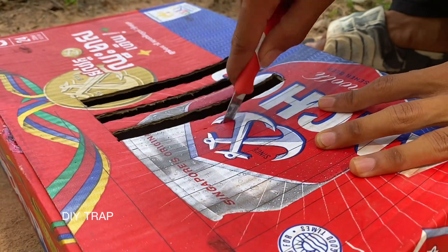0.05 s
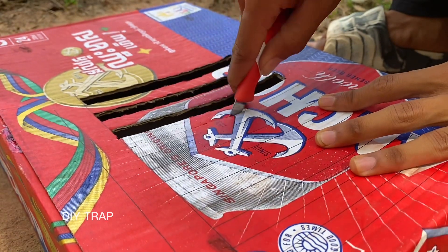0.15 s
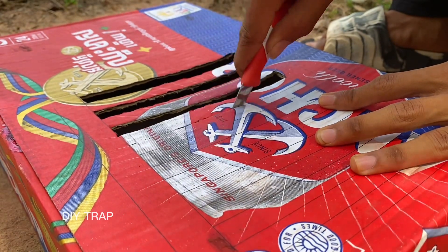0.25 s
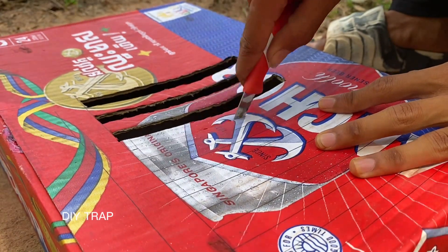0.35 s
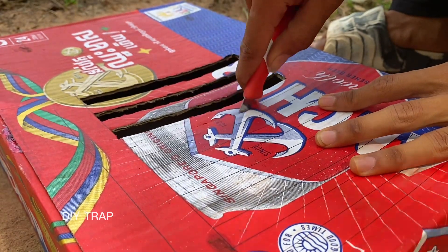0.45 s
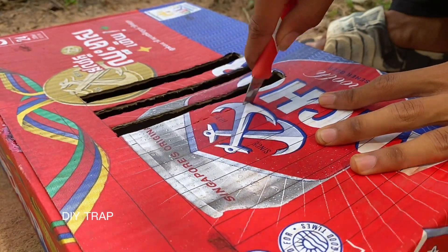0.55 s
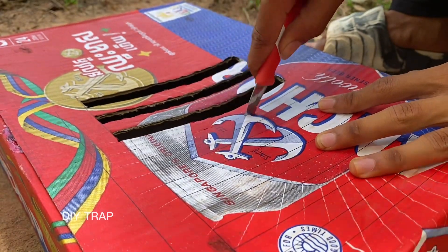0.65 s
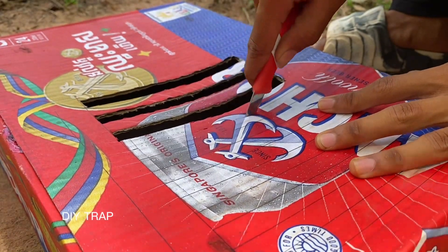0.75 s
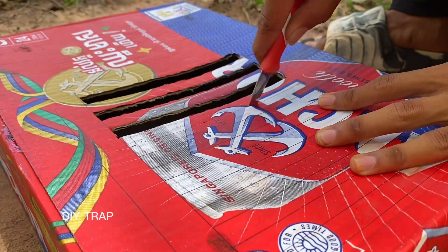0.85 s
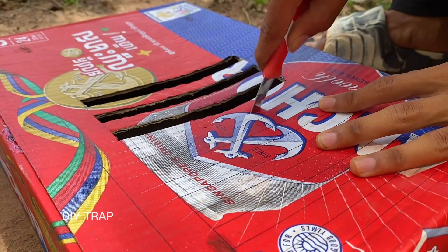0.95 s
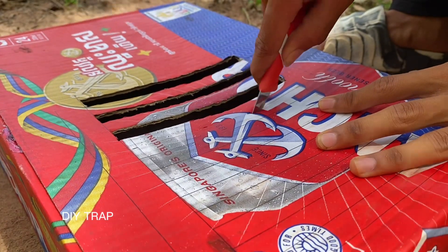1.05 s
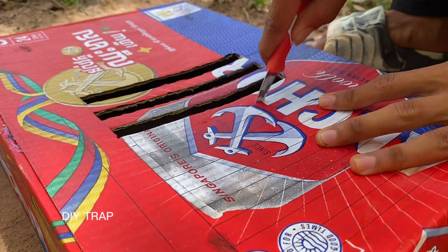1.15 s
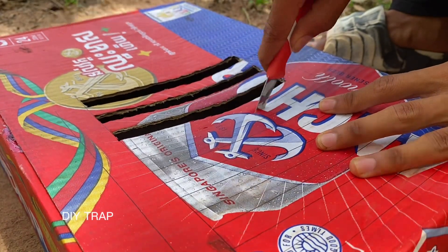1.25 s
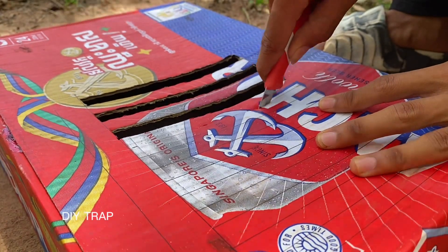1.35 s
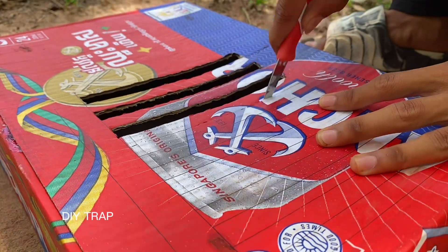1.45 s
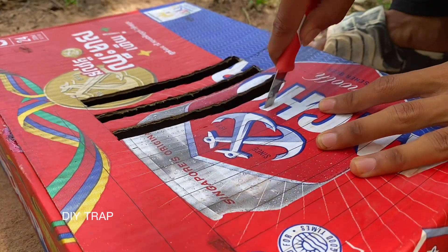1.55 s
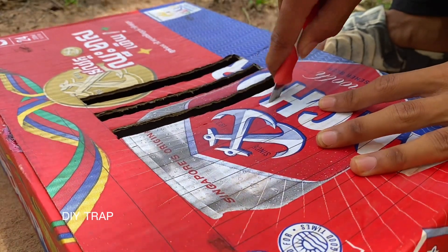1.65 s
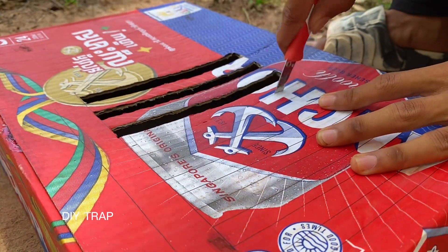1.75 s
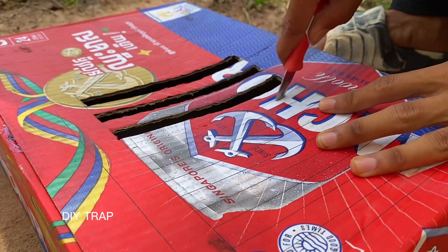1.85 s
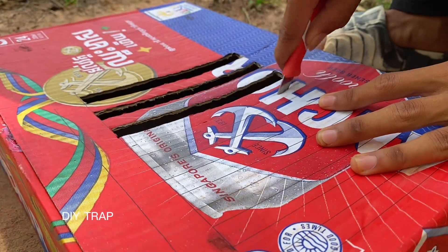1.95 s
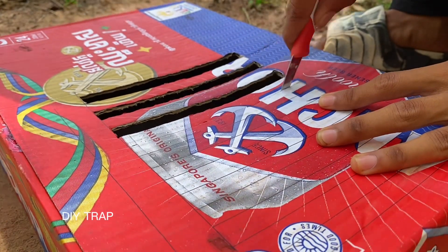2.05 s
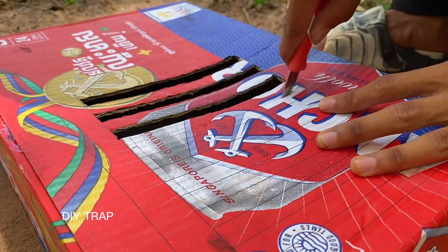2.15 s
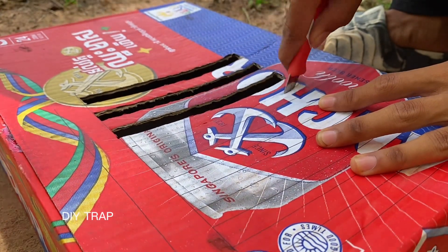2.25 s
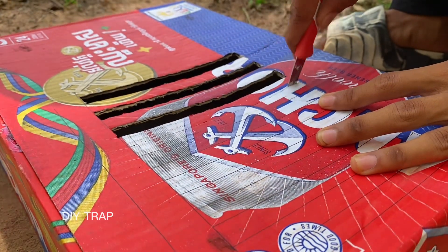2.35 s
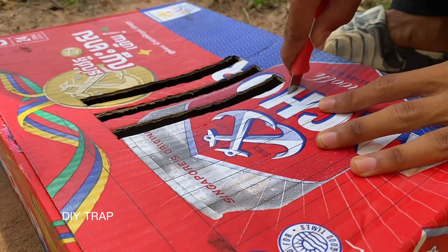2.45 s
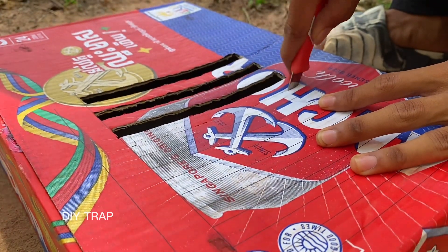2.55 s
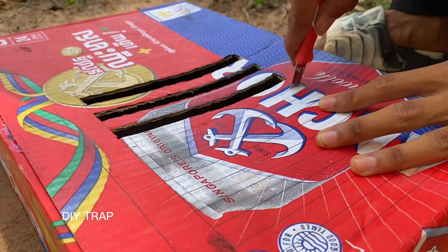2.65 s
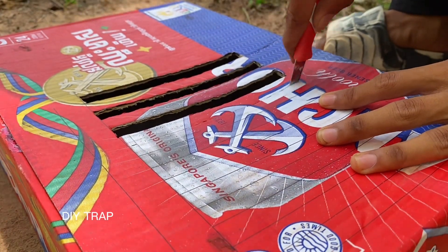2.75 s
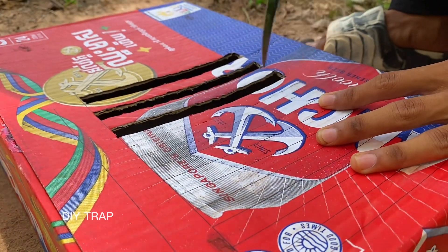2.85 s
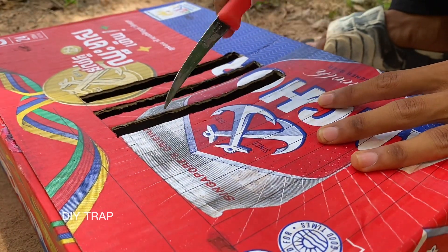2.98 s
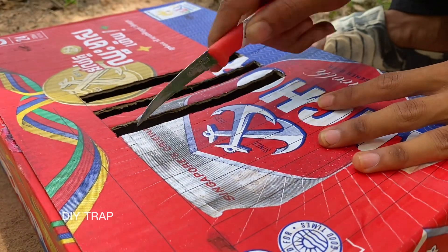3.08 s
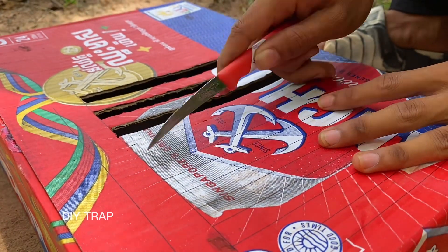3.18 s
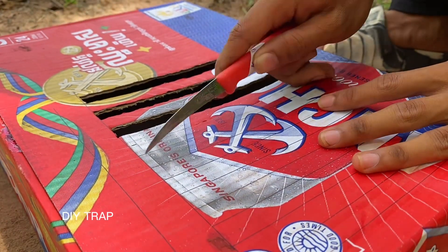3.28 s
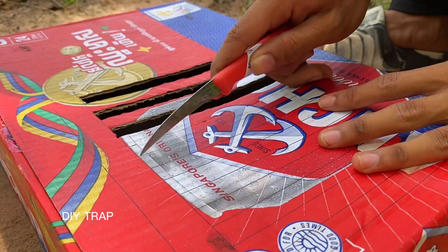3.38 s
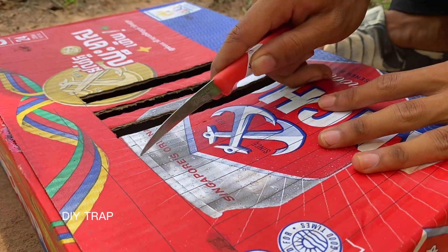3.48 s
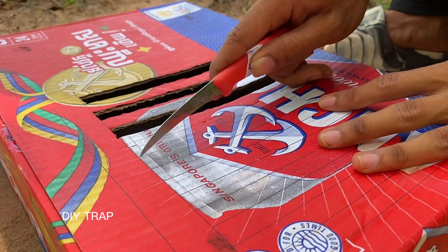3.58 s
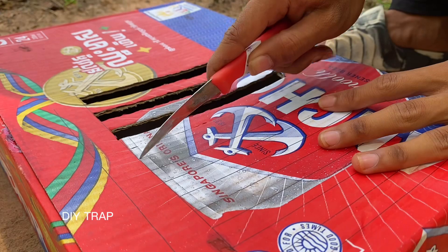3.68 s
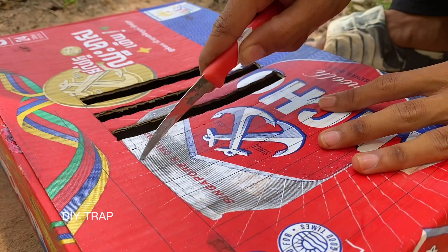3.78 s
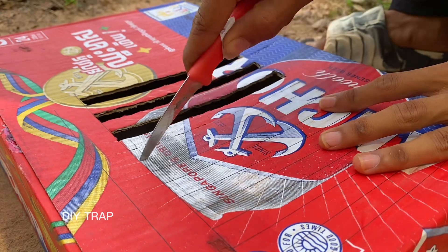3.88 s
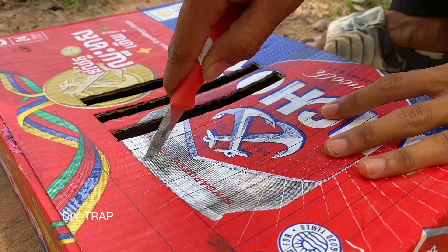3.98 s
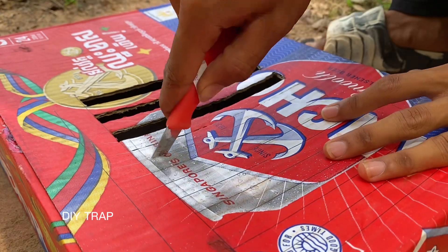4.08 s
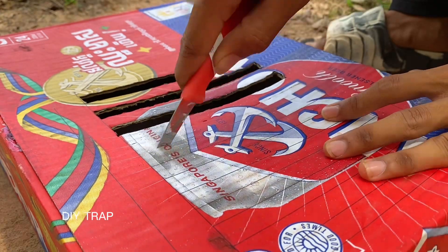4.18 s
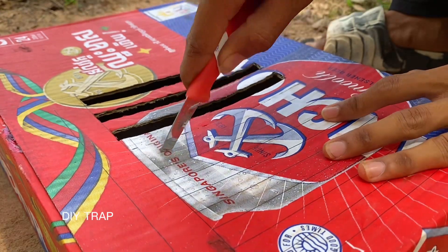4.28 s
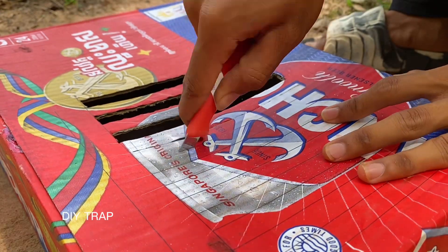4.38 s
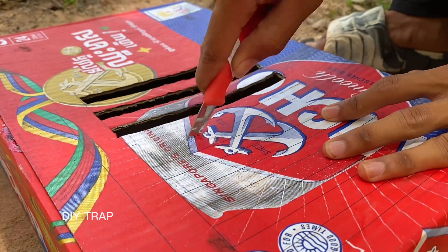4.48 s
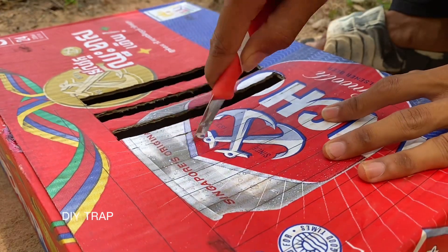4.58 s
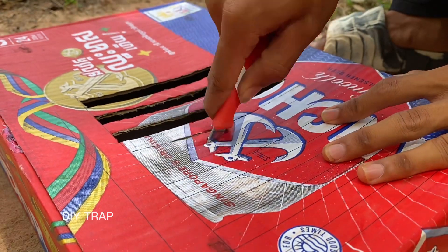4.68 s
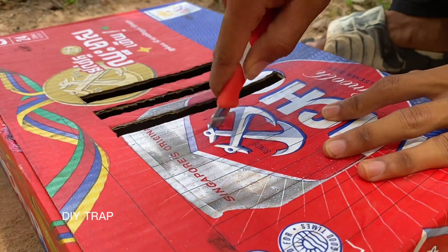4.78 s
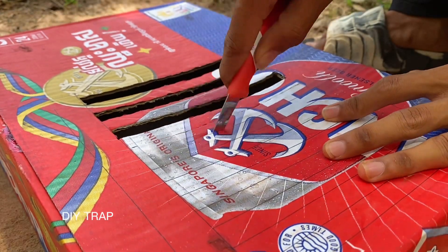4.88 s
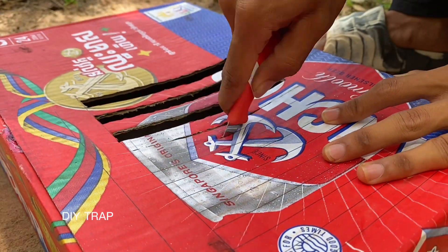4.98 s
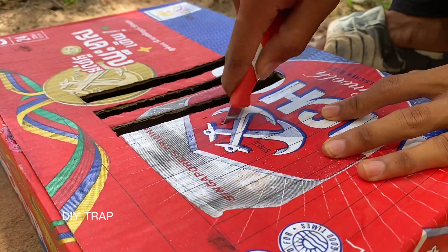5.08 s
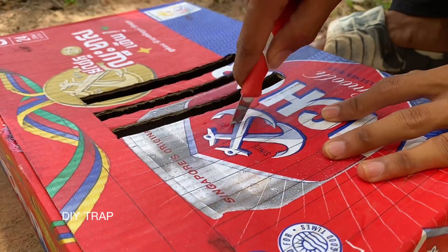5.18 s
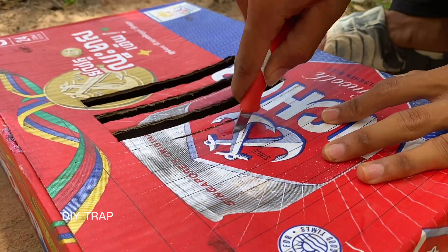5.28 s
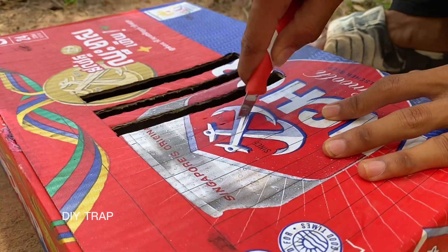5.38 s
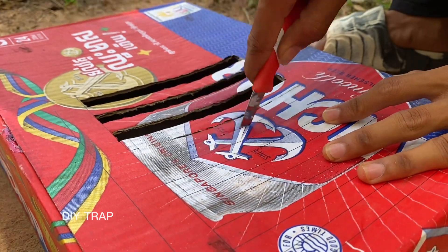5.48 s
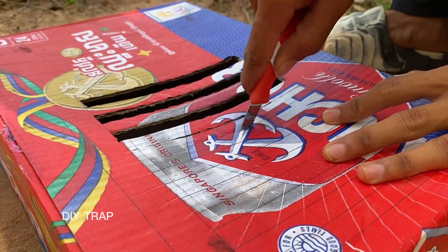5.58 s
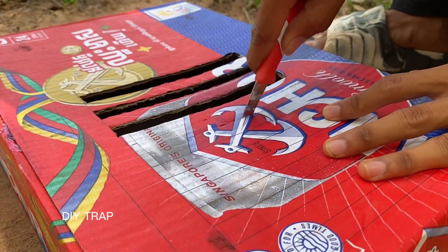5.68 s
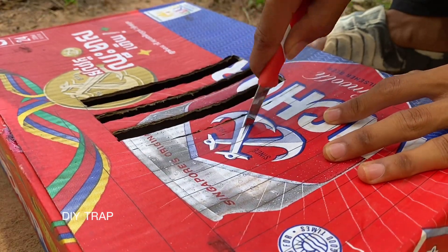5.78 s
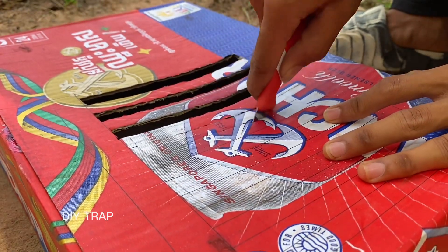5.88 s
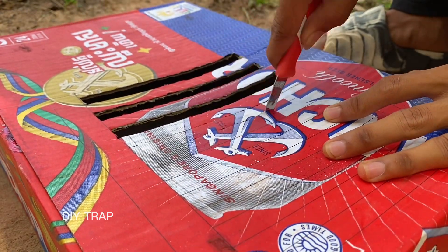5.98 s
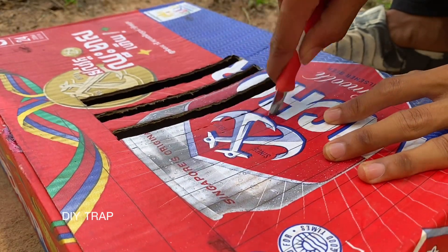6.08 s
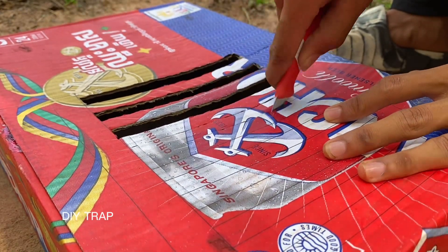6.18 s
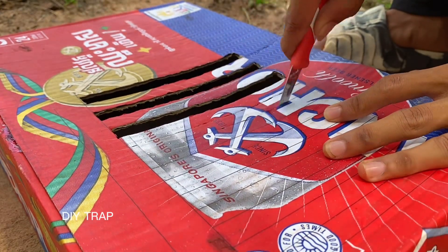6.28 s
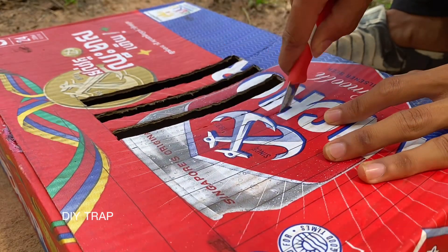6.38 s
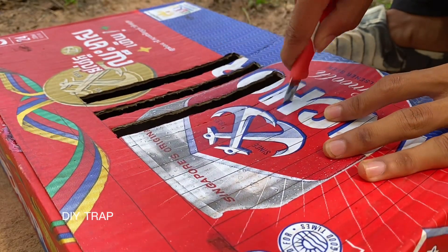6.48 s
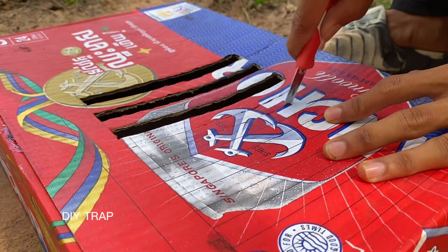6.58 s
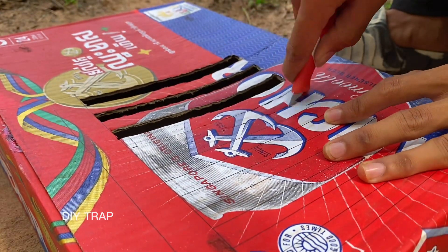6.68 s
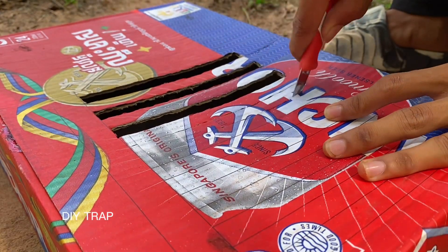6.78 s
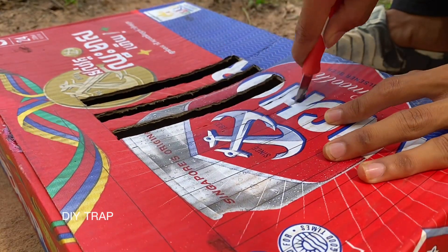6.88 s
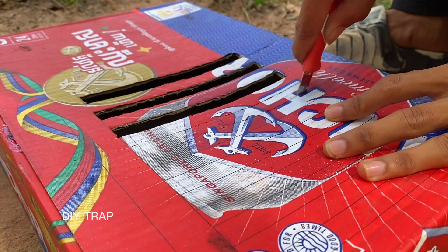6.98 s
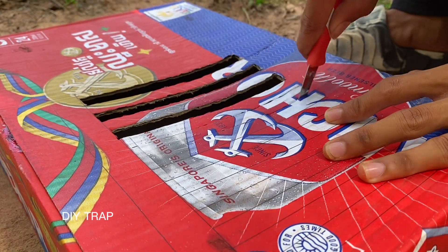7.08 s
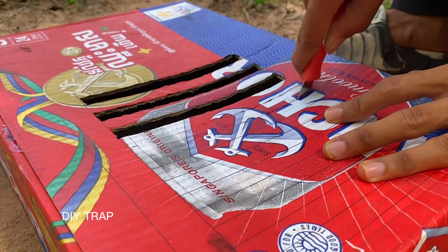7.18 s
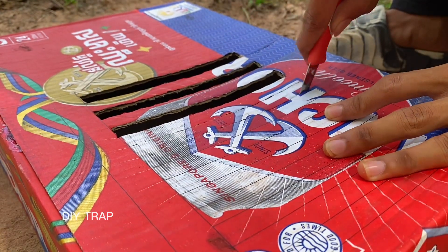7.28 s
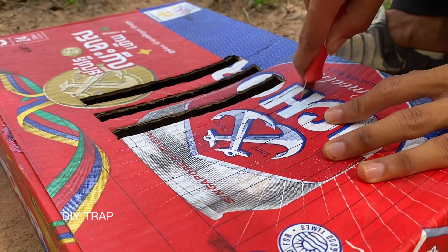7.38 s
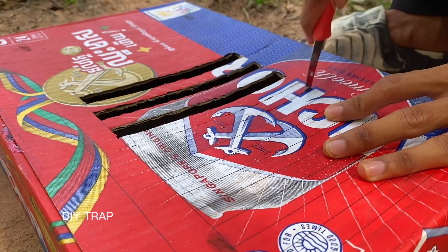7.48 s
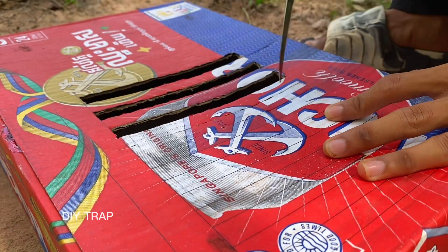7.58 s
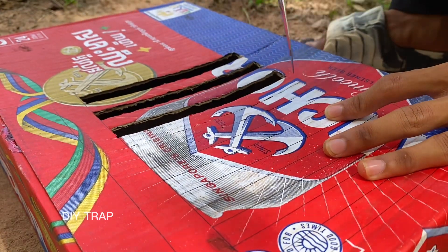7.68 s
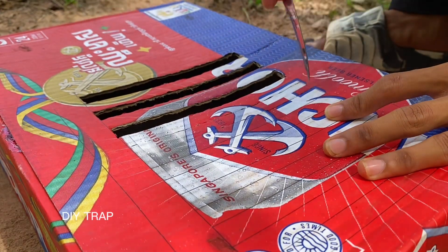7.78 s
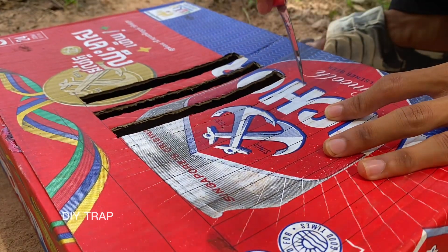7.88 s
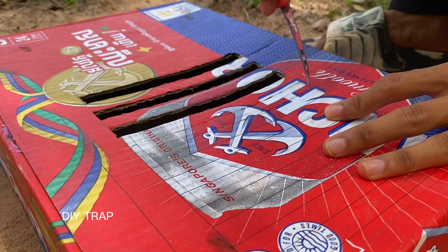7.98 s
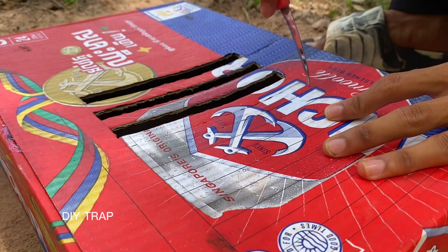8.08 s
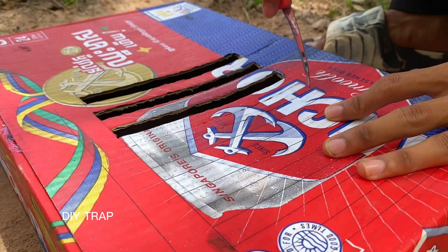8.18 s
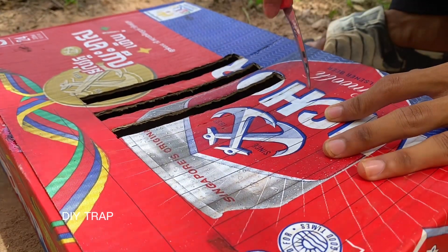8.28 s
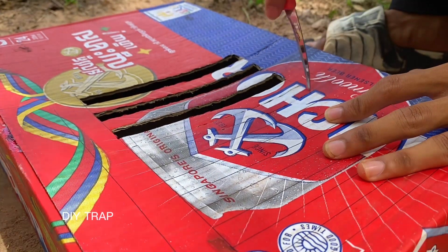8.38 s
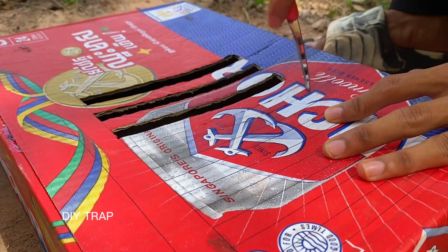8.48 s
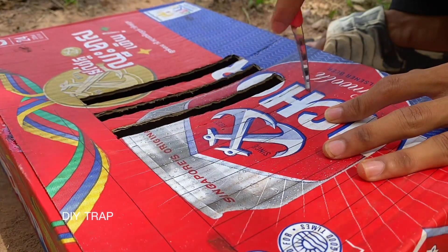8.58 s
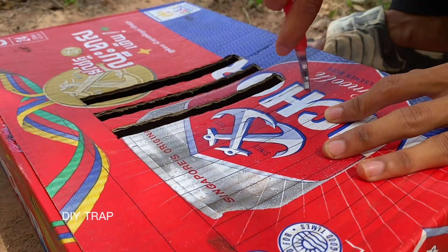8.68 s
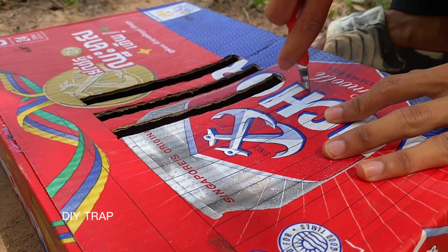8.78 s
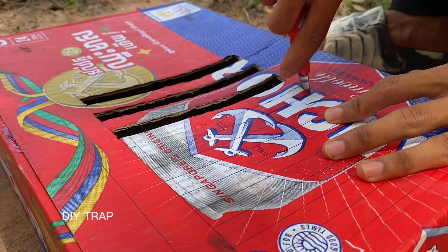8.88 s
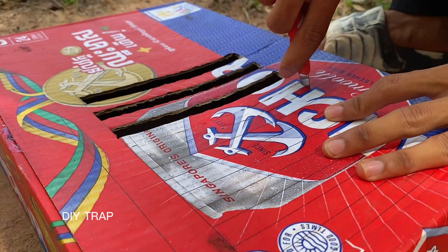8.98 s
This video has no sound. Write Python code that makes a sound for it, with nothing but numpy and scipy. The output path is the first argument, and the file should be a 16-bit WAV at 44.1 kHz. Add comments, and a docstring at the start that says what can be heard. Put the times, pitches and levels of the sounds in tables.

```python
"""A small knife saws through the lid of an empty corrugated box lying on the ground outdoors.
Each stroke tears fibres in a dense train of impulses, heard directly as a rasp and through the modes
of the lid and of the air in the hollow below; each push rocks the box on the ground. In the pauses,
fingers tap and slide on the lid. Soft air noise, a thin insect whine and a low breeze on the
microphone's two ports lie under everything."""
import sys
import numpy as np
from scipy import signal
from scipy.fft import rfft, irfft, next_fast_len
from scipy.io import wavfile

SR = 44100
rng = np.random.default_rng(int(sys.argv[2]) if len(sys.argv) > 2 else 0)


def unload_audio(sound):
    """Save the sound as a 16-bit wav file, at the path given as the first command line argument."""
    columns = np.transpose(np.atleast_2d(sound))
    # keep every value between -1 and 1, then stretch to whole-number steps
    steps = np.round(np.clip(columns, -1, 1) * 32767)
    wavfile.write(sys.argv[1], SR, steps.astype(np.int16))


N = 398663
FFT_SIZE = next_fast_len(N + 8192)
HZ = np.maximum(np.arange(FFT_SIZE // 2 + 1) * SR / FFT_SIZE, 1)

# Levels in the tables are relative: each source applies its own gain as well.
# spectrum of the air noise: frequency_hz, density_db
AIR_SPECTRUM = [(12, -54), (20, -13.5), (76, -12.5), (94, -13.5), (114, -15), (390, -23.5), (496, -26.5),
                (2000, -34), (3150, -37.5), (7220, -41), (12000, -64), (15600, -105), (22000, -120)]
# likeness of the air noise at the two ports: frequency_hz, correlation
AIR_CORRELATION = [(60, 0.58), (290, 0.34), (640, .02), (15000, 0.0091)]
# bands of the insect whine: pitch_hz, width_hz
INSECT_BANDS = [(7190, 60), (7320, 54)]
# wind on the ports: time_s, level_db
BREEZE_LEVEL = [(0.0, -53), (0.33, -32), (1.03, -52), (1.23, -35), (1.66, -60), (3.62, -50.5), (3.7, -74),
                (4.51, -59), (5.08, -47), (5.36, -45), (5.69, -55), (5.84, -58), (8.21, -57), (8.41, -60),
                (8.71, -67), (9.04, -72)]
# phase of the left port ahead of the right: frequency_hz, lead_rad
LEFT_PHASE = [(0, 0), (1210, 0.2), (2330, 0.3), (3100, 1.0), (6370, 0.2), (7240, -0.7), (8440, -3.1),
              (9820, -6.1), (10600, -6.6), (11700, -9.4), (12700, -9.5), (13400, -12.6), (14500, -12.5),
              (15300, -15.7)]
# level of the left port over the right: frequency_hz, level_db
LEFT_LEVEL = [(60, 2), (500, 1.6), (1000, 3), (2400, 5.5), (4400, 3), (8100, 0), (15000, 0)]
# scattered sound, unlike at the two ports: frequency_hz, level_db
SCATTER_SPECTRUM = [(60, -9), (150, -9), (300, -14), (700, -11), (1500, -7), (4000, -4), (9000, -8),
                    (15000, -11)]

# modes of the box on the ground: pitch_hz, level_db, t60_s
ROCKING_MODES = [(66, -47, 0.047), (98.5, 4.5, 0.1)]
# modes of the air in the box: pitch_hz, level_db, t60_s
HOLLOW_MODES = [(168.7, -2, 0.13), (183.9, -4.5, 0.08), (221.7, -12, 0.056)]
# bending modes of the lid: pitch_hz, level_db, t60_s
LID_MODES = [(293.8, -3.5, 0.087), (350.4, -3, 0.068), (434, -1.5, 0.032), (549, 2, 0.033),
             (614, 2.5, 0.029), (684, 2.5, 0.023), (795, 1, 0.016), (952, -1, 0.012), (1061, -3, 0.016),
             (1176.4, -5.5, 0.016)]
LOWER_LID_MODES, UPPER_LID_MODES = LID_MODES[:3], LID_MODES[3:]
# resonances of the paper channels: pitch_hz, width_hz, level_db
FLUTE_RESONANCES = [(1250, 150, 1), (1750, 200, 3), (2300, 130, 3), (2580, 140, 7), (2980, 160, 5),
                    (3350, 180, 2), (3880, 160, 7), (4450, 250, 1), (5500, 250, 0)]

# pushes that jolt the whole box: start_s, level_db
PUSHES = [(0.071, -41), (0.236, -31), (0.4, -43), (0.686, -31), (1.164, -20.5), (1.421, -39), (1.644, -39),
          (2.418, -32), (3.072, -36.5), (3.743, -21), (3.844, -47), (4.057, -29), (4.159, -25),
          (4.355, -13.5), (4.518, -19), (4.63, -20), (4.801, -10.5), (4.939, -21.5), (5.119, -24),
          (5.309, -23), (5.395, -24.5), (5.826, -18.5), (5.985, -20), (6.226, -38), (7.474, -31),
          (8.385, -35)]
# trembling under the pressure of the hands: time_s, level_db
HAND_TREMBLE = [(0.0, -41.5), (1.2, -46.5), (1.7, -52.5), (2.8, -70), (3.1, -57), (3.65, -65), (3.75, -46),
                (4.07, -36), (4.13, -49), (4.5, -44), (5.3, -50.5), (6.1, -43.5), (7.2, -65), (8.3, -62),
                (8.5, -57), (9.04, -54)]
# finger taps: start_s, level_db, hollow_over_tap_db, tick_over_tap_db
FINGER_TAPS = [(3.181, -36, -8, -7), (3.261, -43, 6.5, 1), (3.747, -20, 1.5, -27), (3.825, -23, -7, -18),
               (7.848, -24, -11, -16.5), (8.377, 0.0, -15.5, -15), (8.416, -8.5, -7.5, -11.5)]
# finger slides: hold_start_s, rise_ms, hold_ms, fall_ms, hiss_db, hollow_over_hiss_db
FINGER_SLIDES = [(3.02, 29, 13, 150, -60.5, 11), (3.2, 67, 25, 210, -63, 24.5),
                 (8.45, 5, 3.8, 150, -47, 12), (8.612, 17, 10, 90, -42, 8.5),
                 (8.645, 300, 57, 494, -45, 2.5), (9.035, 66, 20, 50, -61, 17)]
# friction hiss of the fingers: frequency_hz, density_db
HISS_SPECTRUM = [(590, -75), (1000, 1), (1490, -19.5), (2970, -14.5), (5660, -23.5), (6790, -15.5),
                 (11300, -29.5), (12100, -51), (15000, -37)]
# single fibres and flute walls giving way: start_s, level_db
FIBRE_SNAPS = [(0.065, -16.5), (0.378, -31), (0.9667, -20.5), (1.0425, -22), (1.3055, -19), (1.632, -16),
               (1.8911, -25.5), (2.1949, -26), (2.599, -26), (2.7705, -29), (3.748, -24), (3.8282, -39),
               (4.3166, -16.5), (4.356, -9), (4.6255, -13), (4.801, -34), (4.9112, -24), (4.9382, -17.5),
               (5.2205, -25), (5.4986, -29), (5.813, -21), (6.0753, -23.5), (6.628, -24), (6.8693, -27),
               (7.008, -33), (7.1077, -26), (7.3372, -23)]
# spectrum of tearing fibres: frequency_hz, density_db
RASP_SPECTRUM = [(900, -15.5), (1300, 7.5), (1900, -1), (2500, -1), (4000, -7), (6000, -11), (8000, -6.5),
                 (10000, -8.5), (11200, -13.5), (12000, -18), (14500, -28), (16000, -13)]
# bites of the blade: hold_start_s, hold_ms, bite_db, release_db, lid_over_rasp_db, hollow_over_mean_db
BLADE_STROKES = [(0.063, 12, -34, -25, 8.5, -15), (0.095, 21.7, -29.5, -31.5, 10.5, 4),
                 (0.243, 58, -47, -54.5, 8, 10.5), (0.392, 25.3, -33, -34.5, 7.5, 2.5),
                 (0.528, 88, -46, -52.5, 5.5, 7), (0.68, 6.7, -41.5, -42.5, 5, 9),
                 (0.727, 27, -43, -51.5, 5, 13), (0.848, 51, -42.5, -53, 7.5, -5),
                 (0.97, 8.7, -43.5, -39, 4, -5), (0.982, 56, -37.5, -50.5, 6, 4),
                 (1.042, 7, -39.5, -44, 11, 2), (1.14, 45.5, -46, -47.5, 9, 11),
                 (1.268, 21, -42, -36, 8, 4), (1.307, 9.2, -31.5, -36.5, 7, -4),
                 (1.325, 15, -51, -45.5, 6, 8), (1.419, 57, -40.5, -51, 6, 2),
                 (1.553, 74, -48, -52, 4.5, -15), (1.628, 28.5, -33, -39, 9, 3),
                 (1.722, 38, -39.5, -45.5, 3, 1), (1.822, 38, -64, -48, 11, -11),
                 (1.892, 29, -38.5, -42, 11, 5.5), (2.012, 52, -45.5, -49, 5, 7),
                 (2.125, 48, -56, -47, 9.5, 1), (2.193, 15.6, -39.5, -35, 10, 5.5),
                 (2.309, 36, -42.5, -44.5, 5, 6.5), (2.417, 24, -52.5, -53, 10.5, 5),
                 (2.481, 28.6, -45.5, -49, 11, 11), (2.598, 26, -44, -43.5, 8.5, 9),
                 (2.69, 7.2, -57, -45.5, 10.5, 2), (2.773, 3.6, -44, -43, 15.5, 14),
                 (2.816, 23.6, -47, -38.5, 9.5, 3.5), (3.728, 8.5, -44.5, -35, 7, 13),
                 (3.778, 4.6, -46, -47.5, 7, 10), (3.819, 8.4, -63, -34.5, 7, -3),
                 (3.853, 220, -48, -33.5, 2.5, 9), (4.157, 79, -46, -52.5, 4.5, 13.5),
                 (4.319, 14.6, -32, -28, -1.5, 17.5), (4.356, 41.7, -27, -24, 2.5, -2),
                 (4.466, 85, -43.5, -47.5, 5, 5.5), (4.628, 60.2, -30.5, -28, 7, 5),
                 (4.783, 24, -49, -42.5, 4.5, 17.5), (4.829, 45, -45, -58.5, 4.5, 7),
                 (4.939, 49, -33, -31, 8.5, 1), (5.072, 62, -61, -46, 8.5, 4.5),
                 (5.151, 28, -50.5, -53.5, 5, 9), (5.266, 38.4, -39.5, -40, 10, 8),
                 (5.388, 62, -46, -52.5, 5.5, 7), (5.528, 69, -51.5, -52, 5, 5),
                 (5.683, 54, -48.5, -47.5, 6, 3.5), (5.808, 53.5, -35.5, -31.5, 6, -0.5),
                 (5.938, 14, -51.5, -44.5, 6.5, 3), (5.979, 41, -40.5, -43.5, 5, 14),
                 (6.078, 54.3, -35.5, -33.5, 4.5, -2), (6.212, 85, -47.5, -43, 4, 6.5),
                 (6.362, 17, -43.5, -45, 8, 2.5), (6.403, 33, -49.5, -46.5, 7, 7),
                 (6.509, 62, -43.5, -51.5, 4.5, 3.5), (6.626, 42.6, -36.5, -35.5, 7.5, 4.5),
                 (6.765, 56, -43, -44.5, 4.5, 8.5), (6.872, 20, -44, -43, 9, 8),
                 (6.905, 43, -48.5, -51.5, 5.5, 5), (7.011, 40, -44, -42.5, 5, -3.5),
                 (7.109, 20, -41, -49.5, 11.5, 4), (7.138, 45, -50, -53, 5.5, 12),
                 (7.254, 34, -44, -44, 6.5, 9), (7.335, 28.4, -40, -39.5, 10, 6),
                 (7.47, 16.4, -49, -41, 10, 21.5), (7.5, 60, -43, -50.5, 1, -10)]
# spans in which the blade stays in the slot and drags faintly: start_s, end_s
DRAG_SPANS = [(0.0, 2.85), (3.72, 6.5)]
# timbre along the cut: time_s, treble_over_low_rasp_db, lower_over_upper_lid_db
CUT_TIMBRE = [(0.0, -3.5, -12.5), (0.8, -4, -5.5), (1.6, -2, -6.5), (2.3, -6.5, -5.5), (2.7, -9, -10),
              (2.85, 4.5, -3.5), (3.7, -7, -7.5), (4.1, -6, -6), (4.601, -2, -5.5), (5.4, 0, -9),
              (5.9, -6, -4.5), (6.6, -3.5, -2), (7.3, -9, -6), (7.55, 4, -7)]


def amp(db):
    """Amplitude ratio of a level in decibels."""
    return 10 ** (np.asarray(db) / 20)


def unit_rms(x):
    """Normalisation to unit mean power."""
    return x / np.sqrt(np.mean(x ** 2) + 1e-20)


def at_hz(points):
    """Interpolation of (frequency_hz, value) rows onto the FFT grid, on a log frequency axis."""
    hz, value = np.transpose(points)
    return np.interp(np.log(HZ), np.log(np.maximum(hz, 1)), value)


def in_time(points):
    """Linear interpolation of (time_s, value) rows at every sample."""
    return np.interp(np.arange(N) / SR, *np.transpose(points))


def filtered(x, response):
    """Linear filtering: the spectrum is multiplied by a frequency response."""
    return irfft(rfft(x, FFT_SIZE) * response, FFT_SIZE)[..., :N]


def delay(seconds):
    """Response of a pure delay: phase lag proportional to frequency."""
    return np.exp(-2j * np.pi * HZ * seconds)


def drift(corner_hz):
    """Random fluctuation: low-passed noise of unit rms."""
    pole = np.exp(-2 * np.pi * corner_hz * 20 / SR)   # one step every 20 samples
    slow = signal.lfilter([1], [1, -2 * pole, pole ** 2], rng.standard_normal(N // 20 + 2002))[2000:]
    return np.interp(np.arange(N) / 20, np.arange(len(slow)), unit_rms(slow))


def impulses(start_s, level_db):
    """Impulse train, one sample for each event."""
    train = np.zeros(N)
    train[np.round(start_s * SR).astype(int)] = amp(level_db)
    return train


def crackle(clicks, t60_s):
    """Convolution turns each impulse into exponentially decaying noise."""
    age_s = np.arange(4000) / SR
    burst = rng.standard_normal(len(age_s)) * amp(-60 * age_s / t60_s)
    return signal.fftconvolve(clicks, burst)[:N]


def swell(hold_start_s, rise_ms, hold_ms, fall_ms, start_db, end_db):
    """Envelope of one rub, as sample indices and dB: up 40 dB, a ramp over the hold, down 40 dB."""
    stages_s = np.array([rise_ms, hold_ms, fall_ms]) / 1000
    knots_s = hold_start_s - stages_s[0] + np.append(0, np.cumsum(stages_s))
    span = np.arange(max(round(knots_s[0] * SR), 0), min(round(knots_s[3] * SR), N))
    return span, np.interp(span / SR, knots_s, [start_db - 40, start_db, end_db, end_db - 40])


def resonance(x, hz, width_hz):
    """Second-order band-pass resonator with unit peak gain."""
    radius, angle = np.exp(-np.pi * width_hz / SR), 2 * np.pi * hz / SR
    numerator = (1 - radius ** 2) / 2 * np.array([1, 0, -1])
    return signal.lfilter(numerator, [1, -2 * radius * np.cos(angle), radius ** 2], x + 1e-18)


def ring(force, hz, t60_s):
    """Damped oscillator: a unit impulse starts a decaying sine of unit amplitude."""
    radius, angle = amp(-60 / (t60_s * SR)), 2 * np.pi * hz / SR
    feedback = [1, -2 * radius * np.cos(angle), radius ** 2]
    return signal.lfilter([0, np.sin(angle)], feedback, force + 1e-18)


def struck_modes(force, modes, polarity=1):
    """Modal superposition; polarity -1 gives successive modes opposite signs."""
    return sum(amp(db) * polarity ** k * ring(force, hz, t60_s)
               for k, (hz, db, t60_s) in enumerate(modes))


def driven_modes(force, modes, wander_db):
    """Forced vibration, near unit power gain for white noise; the coupling to each mode wanders."""
    motion, power = 0, 0
    for k, (hz, level_db, t60_s) in enumerate(modes):
        weight = amp(level_db) * (-1) ** k / np.sqrt(t60_s * SR)
        coupling = amp(wander_db * drift(5.0))
        motion = motion + weight * ring(force * coupling, hz, t60_s)
        power += amp(level_db) ** 2 / (4 * np.log(1000))
    return motion / np.sqrt(power)


def air_noise():
    """Diffuse noise is correlated at two nearby ports only at long wavelengths."""
    correlation, spectrum = at_hz(AIR_CORRELATION), amp(at_hz(AIR_SPECTRUM))
    mid = filtered(rng.standard_normal(N), spectrum * np.sqrt(1 + correlation))
    side = filtered(rng.standard_normal(N), spectrum * np.sqrt(1 - correlation))
    return amp(-53.5) * unit_rms(np.array([mid + side, mid - side]))


def insects():
    """Narrow-band noise is heard as a pitch: a thin whine whose level flickers."""
    noise = rng.standard_normal((2, N))
    whine = sum(resonance(resonance(noise, hz, width), hz, width) for hz, width in INSECT_BANDS)
    return amp(-75 + 0.81 * drift(25.0)) * unit_rms(whine)


def breeze():
    """Wind on the ports makes low pressure fluctuations, partly correlated between the two."""
    band = signal.butter(2, [30.0, 70.0], "band", fs=SR, output="sos")
    mid, side = signal.sosfilt(band, rng.standard_normal((2, N)))
    rumble = unit_rms(np.array([mid + 0.5 * side, mid - 0.5 * side]))
    return amp(in_time(BREEZE_LEVEL) - 2.0 + 0.83 * drift(3.5)) * rumble


def at_ports(direct):
    """Direct sound reaches each port with its own phase and level; scattered sound is in antiphase."""
    leftward = amp(at_hz(LEFT_LEVEL) / 2) * np.exp(0.5j * at_hz(LEFT_PHASE))
    scattered = filtered(direct * drift(200.0), amp(at_hz(SCATTER_SPECTRUM)))
    return np.array([filtered(direct + scattered, leftward), filtered(direct - scattered, 1 / leftward)])


def box_rocking():
    """Soft pushes excite free vibration of the box on the ground; the hands keep it trembling."""
    clicks = impulses(*np.transpose(PUSHES))
    pulse = np.hanning(round(0.0076 * SR))
    force = np.convolve(clicks, pulse / pulse.sum())[:N]
    jolts = amp(-2.5) * struck_modes(force, ROCKING_MODES)
    aftershake_t60_s = 0.11
    aftershake = amp(-11) * signal.lfilter([1], [1, -amp(-60 / (aftershake_t60_s * SR))], clicks + 1e-18)
    tremble = rng.standard_normal(N) * (aftershake + amp(in_time(HAND_TREMBLE)))
    return jolts + driven_modes(tremble, ROCKING_MODES, wander_db=0.0)


def bending_wave(clicks, travel_at_1hz_s=0.1016):
    """Dispersion in a plate: travel time falls as 1 / sqrt(frequency), so the treble arrives first."""
    band = signal.butter(3, [340.0, 950.0], "band", fs=SR, output="sos")
    dispersion = np.exp(-4j * np.pi * travel_at_1hz_s * np.sqrt(HZ))
    advance = delay(-travel_at_1hz_s / np.sqrt(3500.0))   # zero group delay at 3500 Hz
    return filtered(signal.sosfilt(band, clicks), dispersion * advance)


def finger_taps():
    """Impact excitation: a tick and a bending wave, then the free decay of lid and hollow."""
    start_s, level_db, hollow_db, tick_db = np.transpose(FINGER_TAPS)
    clicks = impulses(start_s, level_db)
    wave = amp(30.0) * bending_wave(clicks)
    reflections = crackle(clicks, t60_s=0.081)   # the lid's edges return the wave to the modes
    lid = amp(-37.0) * struck_modes(reflections, LID_MODES[:7], polarity=-1)
    hollow = amp(-1.0) * struck_modes(impulses(start_s, level_db + hollow_db), HOLLOW_MODES)
    contact = impulses(start_s, level_db + tick_db)
    tick_noise = crackle(contact, t60_s=0.0079) + amp(-15.5) * crackle(contact, t60_s=0.099)
    tick = amp(2.5) * filtered(tick_noise, amp(at_hz(RASP_SPECTRUM)) * delay(0.00168))
    return wave + lid + filtered(hollow, delay(0.0062)) + tick


def slide_envelopes(lid_over_hiss_db=10):
    """Sliding friction of the fingers swells and fades: gains of hiss, lid and hollow."""
    gains = np.zeros((3, N))
    for time_s, rise_ms, hold_ms, fall_ms, hiss_db, hollow_db in FINGER_SLIDES:
        span, level_db = swell(time_s, rise_ms, hold_ms, fall_ms, hiss_db, hiss_db)
        slide = amp([level_db, level_db + lid_over_hiss_db, level_db + hollow_db])
        gains[:, span] = np.maximum(gains[:, span], slide)
    return gains


def fibre_snaps():
    """Sudden fracture radiates a short crack and strikes the upper modes of the lid."""
    clicks = impulses(*np.transpose(FIBRE_SNAPS))
    knock = amp(-7.0) * struck_modes(clicks, UPPER_LID_MODES, polarity=-1)
    dulled_rasp = amp(at_hz(RASP_SPECTRUM)) / (1 + (HZ / 4400.0) ** 4)
    return knock + amp(-2.5) * filtered(crackle(clicks, t60_s=0.023), dulled_rasp)


def tearing_force(tears_per_s=14000, spread_db=2.2, lump_db=1.5):
    """Shot noise of fibres breaking at random, in lumps as the blade sticks and slips."""
    sizes = amp(spread_db * np.minimum(rng.exponential(1, N), 5))
    signs = rng.choice([-1, 1], N)
    breaks = rng.random(N) < tears_per_s / SR
    return unit_rms(sizes * signs * breaks * amp(lump_db * drift(43.0)))


def rasp_bands(force, crossover_hz=4960.0):
    """Resonance in the paper channels colours the tearing: low and treble bands, each of unit rms."""
    channels = sum(amp(db + 2 + 3.5 * drift(6.0)) * resonance(force, hz, width_hz)
                   for hz, width_hz, db in FLUTE_RESONANCES)
    treble_share = 1 / (1 + (crossover_hz / HZ) ** 6)
    return [unit_rms(filtered(force + channels, amp(at_hz(RASP_SPECTRUM)) * share))
            for share in (1 - treble_share, treble_share)]


def stroke_envelopes(firm_db=-30, drag_db=-68.5):
    """Amplitude modulation by the blade: gains of rasp, lid and hollow. Weak bites swell more slowly."""
    gains = np.zeros((3, N))
    snap_times_s = np.array(FIBRE_SNAPS)[:, 0]
    for time_s, hold_ms, bite_db, release_db, lid_db, hollow_db in BLADE_STROKES:
        opens_with_snap = np.min(np.abs(snap_times_s - time_s)) < 0.005
        rise_ms = 28.6 if opens_with_snap else 39 + 0.44 * (firm_db - bite_db)
        fall_ms = 44.4 + 1.5 * (firm_db - release_db)
        span, rasp_db = swell(time_s, rise_ms, hold_ms, fall_ms, bite_db, release_db)
        steady_db = (bite_db + release_db) / 2 + hollow_db   # the hollow answers the stroke as a whole
        _, air_db = swell(time_s, rise_ms, hold_ms, fall_ms, steady_db, steady_db)
        gains[:, span] = np.maximum(gains[:, span], amp([rasp_db, rasp_db + lid_db, air_db]))
    for start_s, end_s in DRAG_SPANS:
        gains[:, round(start_s * SR):round(end_s * SR)] += amp(drag_db)
    return gains


def sawing_and_sliding():
    """Blade rasp and finger hiss radiate directly; both actions force lid and hollow into vibration."""
    force = tearing_force()
    saw_rasp, saw_lid, saw_hollow = stroke_envelopes()
    slide_hiss, slide_lid, slide_hollow = slide_envelopes()
    timbre = np.array(CUT_TIMBRE)
    treble_ratio, lower_ratio = amp(in_time(timbre[:, [0, 1]])), amp(in_time(timbre[:, [0, 2]]))
    low, treble = rasp_bands(force)
    rasp = saw_rasp * (low + treble_ratio * treble) / np.sqrt(1 + treble_ratio ** 2)
    hiss = slide_hiss * unit_rms(filtered(rng.standard_normal(N), amp(at_hz(HISS_SPECTRUM))))
    upper_drive = force * (saw_lid + 0.75 * slide_lid)
    lower_drive = force * (saw_lid * lower_ratio + 0.47 * slide_lid)
    upper_lid = amp(1.5) * driven_modes(upper_drive, UPPER_LID_MODES, wander_db=2.5)
    lower_lid = amp(0.5) * driven_modes(lower_drive, LOWER_LID_MODES, wander_db=0.5)
    hollow = amp(3.0) * driven_modes(force * (saw_hollow + slide_hollow), HOLLOW_MODES, wander_db=2.0)
    return rasp + hiss + upper_lid + lower_lid + hollow


def scene():
    """Superposition of the box and the outdoor background at the two ports."""
    box = sawing_and_sliding() + fibre_snaps() + box_rocking() + finger_taps()
    return at_ports(box) + breeze() + air_noise() + insects()


def record(dry):
    """Band limiting and soft peak rounding: the microphone drops deep bass and cuts the top; the loudest peaks
    are gently rounded."""
    high_pass = signal.butter(2, 42.0, "high", fs=SR, output="sos")
    low_pass = signal.cheby2(18, 70, 16100, fs=SR, output="sos")
    rounded = 0.95 * np.tanh(signal.sosfilt(high_pass, dry) / 0.95)
    return signal.sosfilt(low_pass, rounded)


dry = scene()
out = record(dry)
unload_audio(out)
```